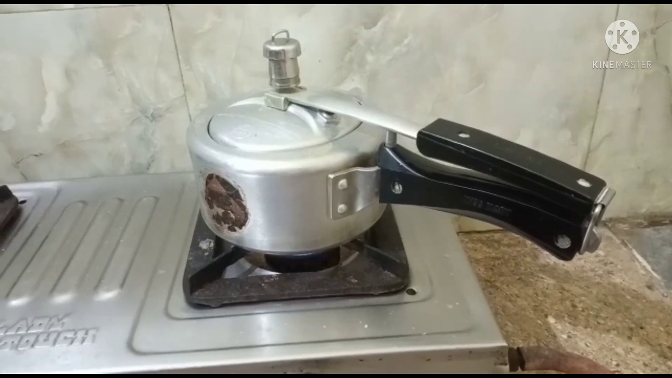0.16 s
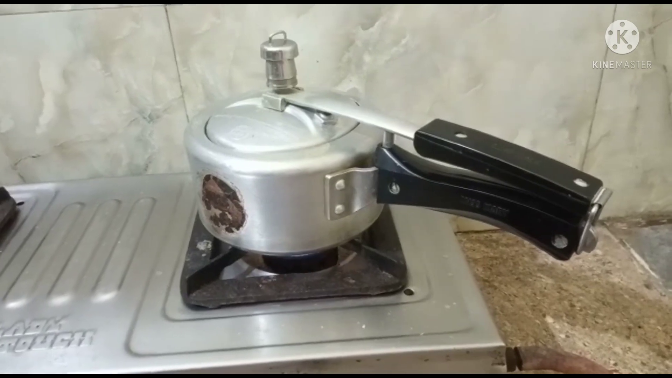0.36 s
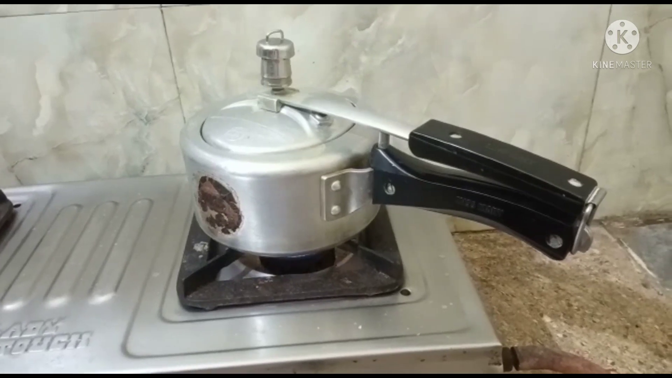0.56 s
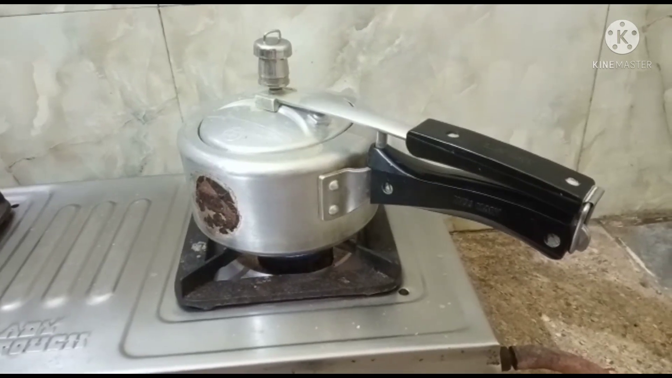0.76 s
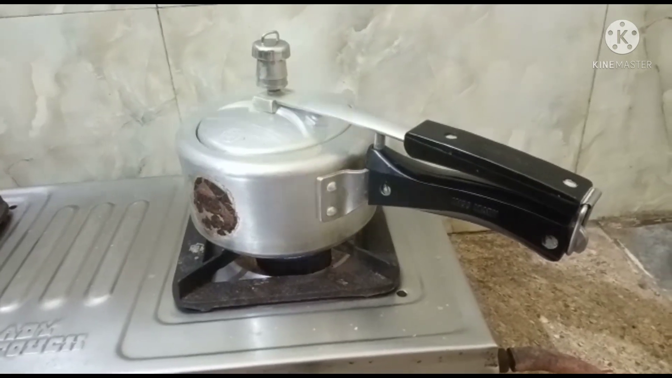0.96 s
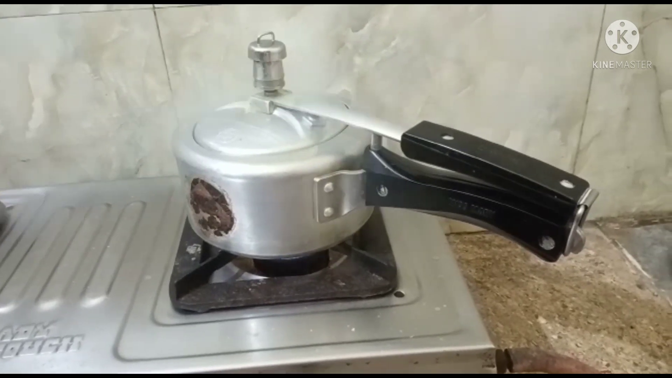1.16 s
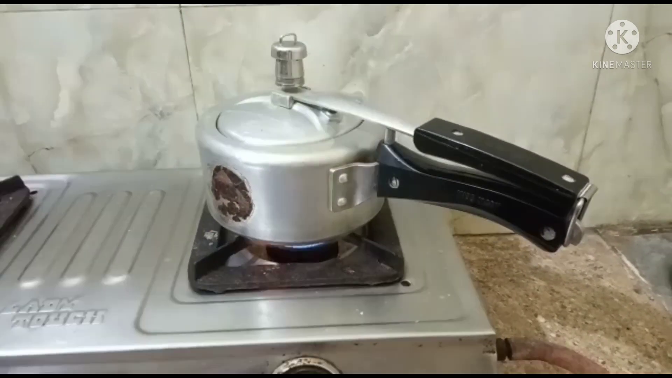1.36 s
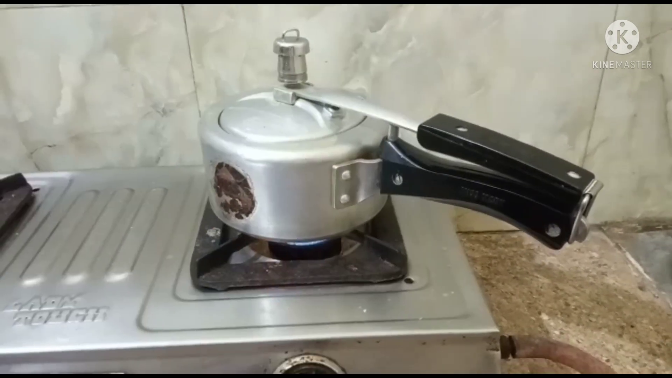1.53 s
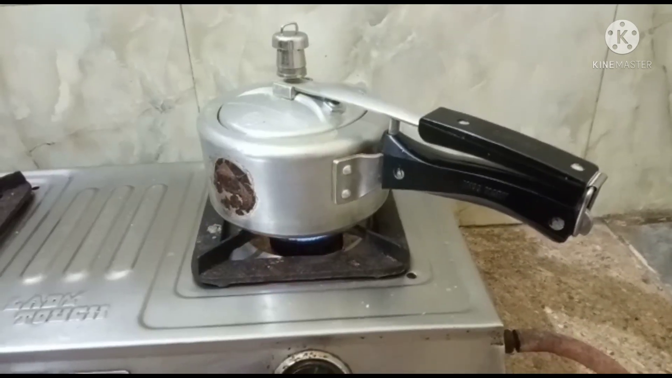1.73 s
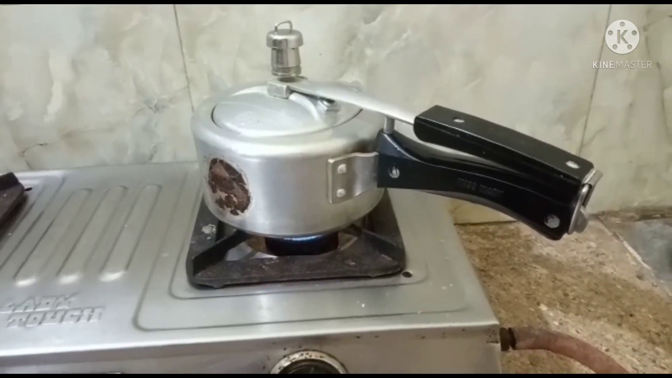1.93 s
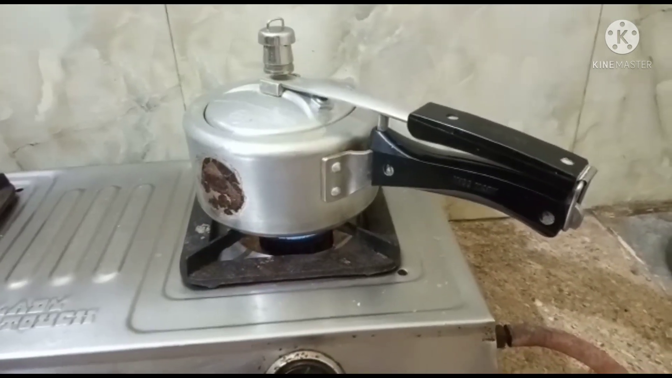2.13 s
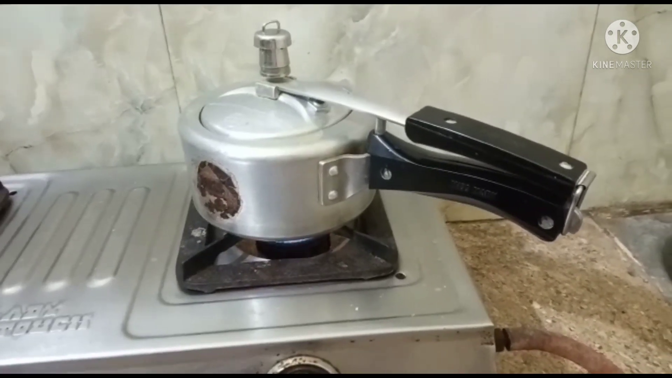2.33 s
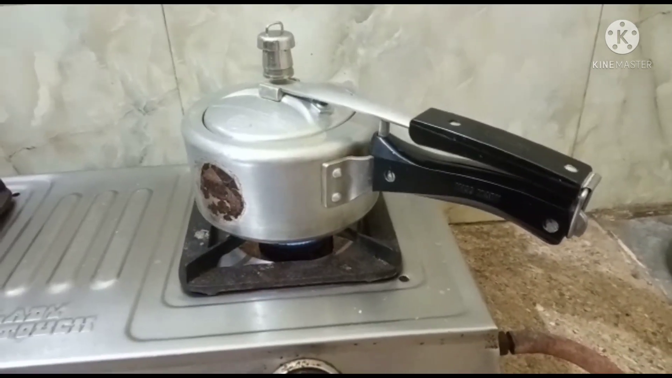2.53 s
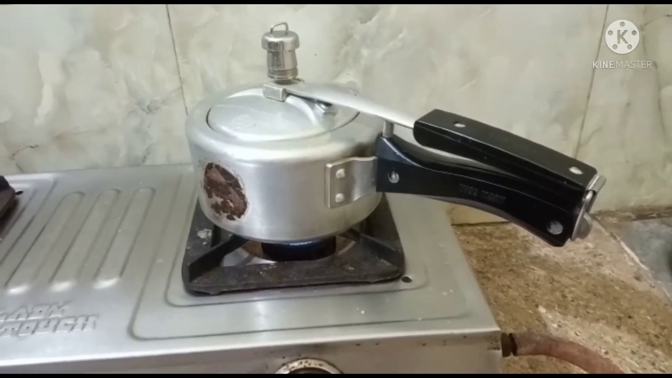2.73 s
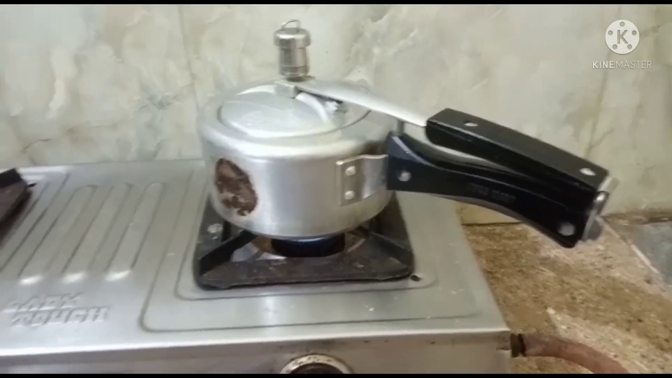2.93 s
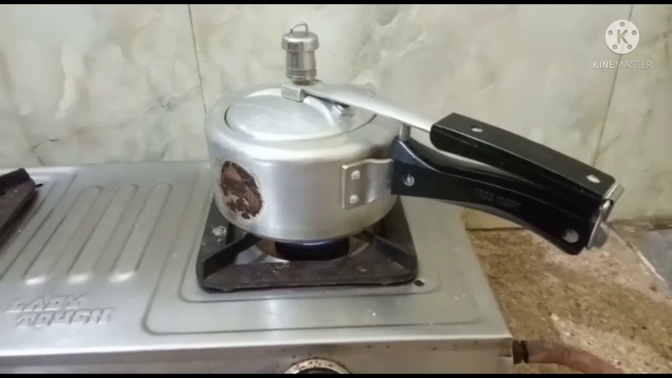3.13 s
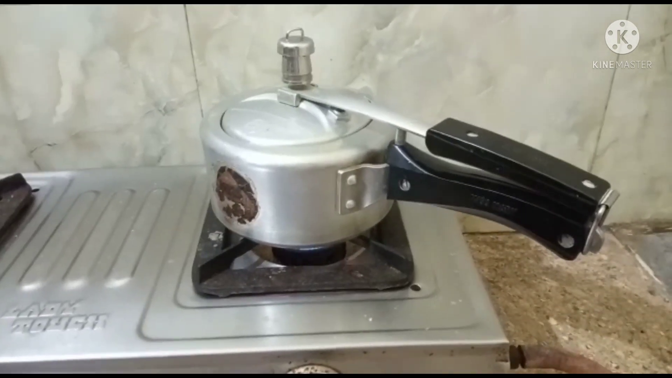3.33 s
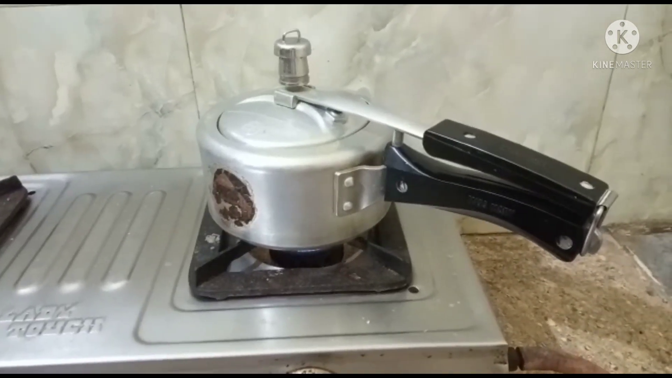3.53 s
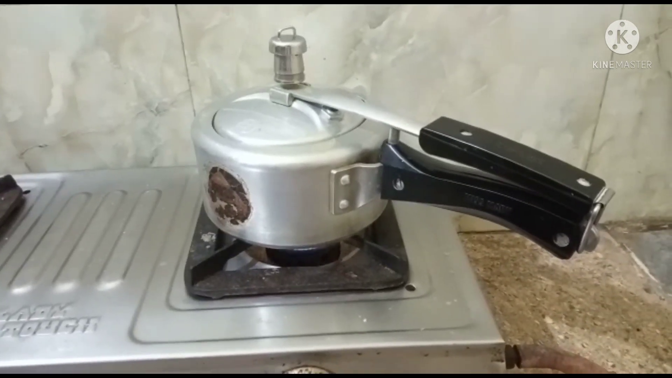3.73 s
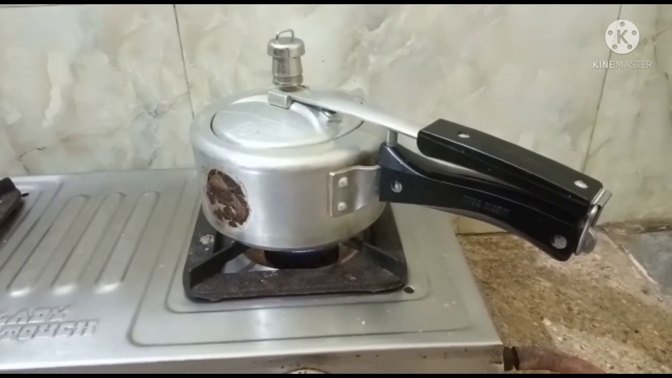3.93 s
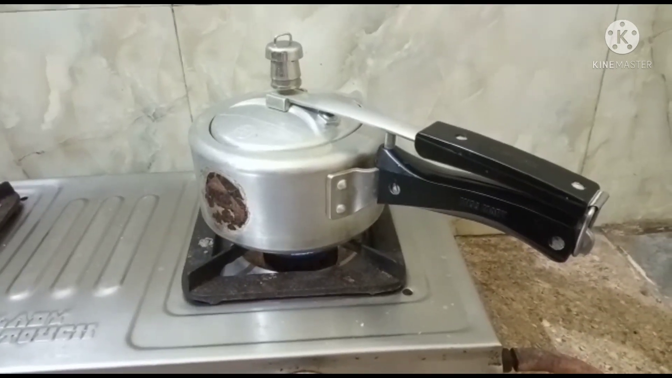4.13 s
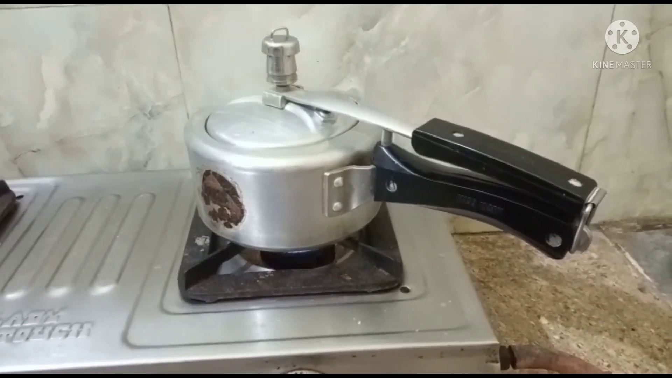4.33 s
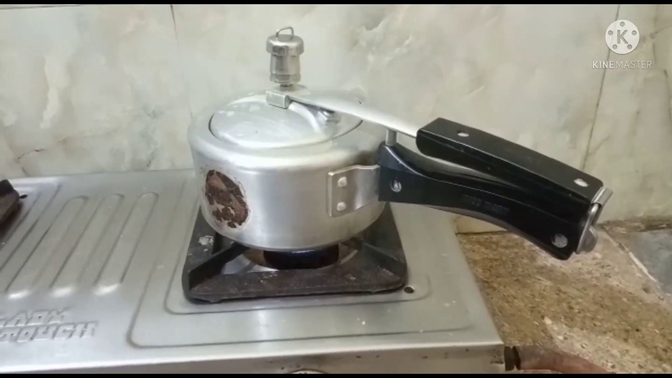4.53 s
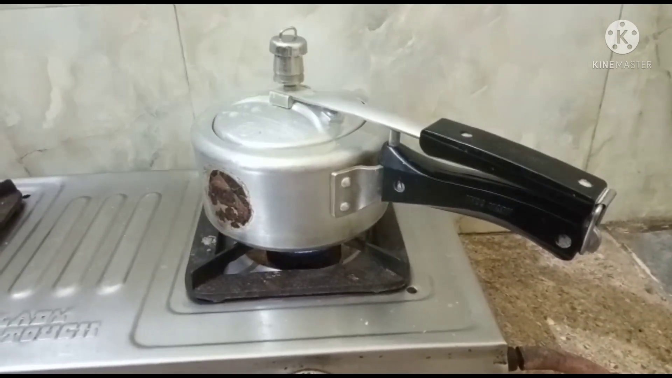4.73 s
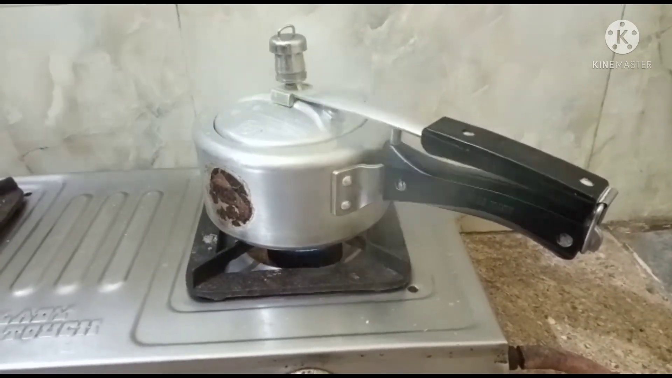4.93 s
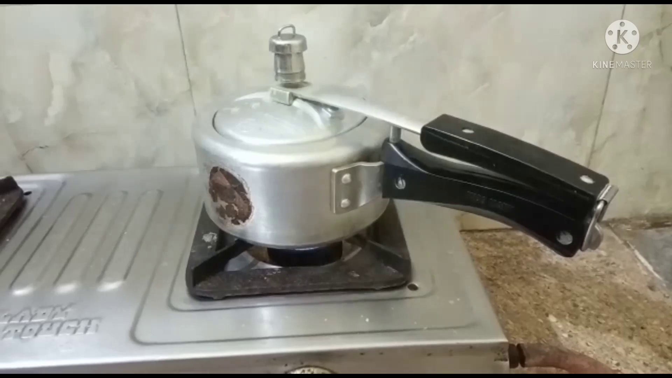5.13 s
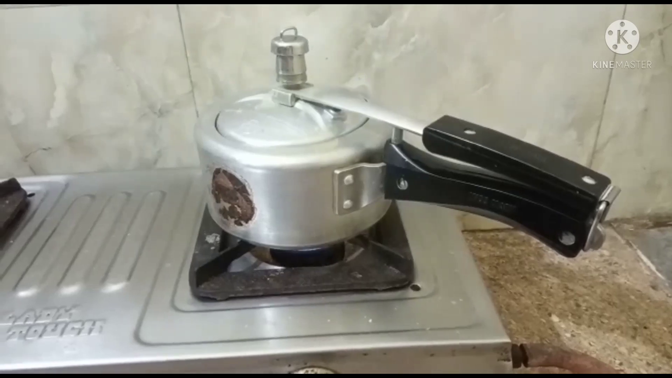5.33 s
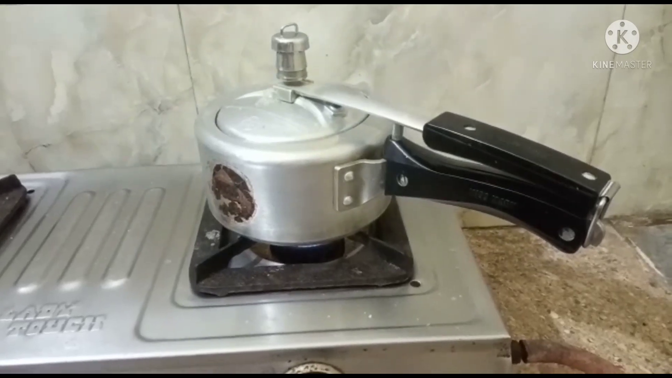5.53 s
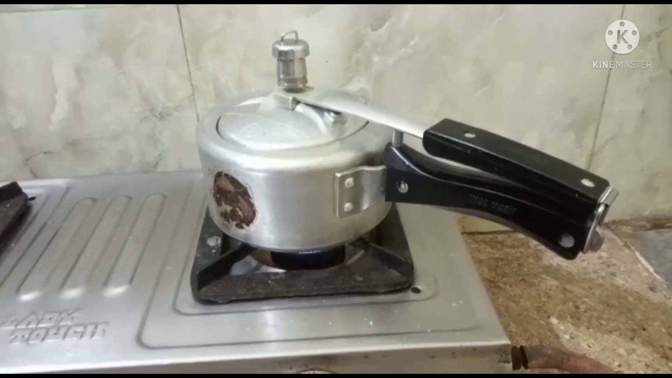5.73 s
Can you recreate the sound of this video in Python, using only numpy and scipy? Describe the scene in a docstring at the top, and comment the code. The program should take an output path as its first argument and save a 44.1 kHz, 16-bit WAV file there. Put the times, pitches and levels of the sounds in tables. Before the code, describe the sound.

A small pressure cooker hisses out a strong jet of steam, cuts abruptly to silence, simmers quietly, then vents again more softly before settling.

```python
"""A small pressure cooker on a gas ring, heard close by in a tiled kitchen corner.
First burst: filtered noise hisses through the gap under the weight valve, a broad jet roars when the weight
lifts, and noise-rung resonances simmer below. It breaks off into a short silence. Simmer, gas flame and faint
hum fade back in; a thin leak and short puffs of steam build up to a second burst, then the simmer is left.
"""
import sys
import numpy as np
from scipy import signal
from scipy.fft import rfft, irfft
from scipy.io import wavfile

SR = 44100
rng = np.random.default_rng(int(sys.argv[2]) if len(sys.argv) > 2 else 0)


def dump_mix(stems):
    """Bounce the given channels to the path in sys.argv[1] as a 16-bit WAV at rate SR."""
    frames = np.atleast_2d(stems).T  # one column per channel
    limited = np.clip(frames, -1, 1)  # hard clip at full scale
    pcm = np.round(limited * 32767).astype(np.int16)
    wavfile.write(sys.argv[1], SR, pcm)


N = 259431
TIME_S = np.arange(N) / SR
FREQS_HZ = np.maximum(np.fft.rfftfreq(N, 1 / SR), 1)

# Gas flame colour. Each row: frequency in Hz, relative level in dB.
FLAME_COLOUR = [(50, -29), (100, -14), (180, -16.5), (300, -18), (760, 0), (1050, -2.5), (1380, -8),
                (1950, -10), (2400, -11.5), (3000, -12.5), (3500, -15.5), (7000, -4), (15000, -24)]
# Pot resonances rung by boiling water. Each row: frequency in Hz, nominal width in Hz, relative level in dB.
POT_RESONANCES = [(268.7, 34, -8.5), (316, 19, -7.5), (382.4, 66, 0.5), (461.5, 48, -3.5),
                  (585.3, 14, -5.5), (899, 45, -4.5), (1030, 73, -1.5), (1260, 70, -7), (1556, 160, -4),
                  (1890, 290, -3.5)]
# Loudest bubbles. Each row: centre in seconds, mean pitch in Hz, peak before any fade in dB,
# Gaussian half-length in seconds.
LOUD_BUBBLES = [(1.653, 806, -60, 0.019), (1.875, 385, -59.5, 0.019), (1.973, 298, -66.5, 0.019),
                (2.107, 386.7, -67, .022), (2.486, 335, -66.5, .03), (2.826, 415, -66.5, .022),
                (2.936, 295, -71, .025), (3.196, 403, -67, 0.02), (3.357, 322, -70, 0.022),
                (3.902, 369, -72.5, 0.0387), (5.113, 382, -64, 0.024), (5.664, 390, -64.5, 0.025),
                (5.831, 385, -71, .029)]
# The simmer eases briefly. Each row: centre in seconds, Gaussian half-length in seconds.
SIMMER_LULLS = [(1.8, 0.03), (3.552, 0.078), (3.733, 0.11), (4.034, 0.084), (5.313, 0.1)]
# Steam through the gap under the seated weight.
# Each row: start in seconds, length in seconds, flow in dB, attack time constant in seconds.
GAP_VENTS = [(-0.02, 0.31, -40, 0.084), (0.361, 0.98, -38.5, 0.039), (1.594, 4.27, -76, 0.014),
             (1.89, 2.57, -58, 0.24), (2.176, 1.13, -63, .045), (2.71, 0.38, -57, 0.073),
             (3.466, .215, -53.8, 0.034), (3.69, 0.32, -66, 0.024), (3.936, 0.42, -54.3, 0.07),
             (4.227, 0.85, -43.5, 0.014)]
# The weight hops off its seat.
# Each row: start in seconds, length in seconds, added hiss flow in dB, roar drive in dB.
WEIGHT_LIFTS = [(0.516, 0.2, -35, -49), (0.691, 0.29, -37.5, -50), (0.969, 0.11, -35.5, -48),
                (1.067, 0.094, -37, -55), (4.294, 0.063, -41, -58), (4.395, 0.16, -39.5, -52.5),
                (4.57, 0.265, -42, -57), (4.653, 0.038, -50, -54.5), (4.924, 0.031, -41, -58)]
# Free jet colour. Each row: frequency in Hz, relative level in dB.
JET_COLOUR = [(20, -34.5), (45, -14), (80, 0), (125, 2.5), (300, 3), (1100, 2), (2500, 2.5), (6000, -5),
              (15000, -2)]
# Hiss colour per burst, the weight sitting differently on its seat; the skirt is its weak low end.
# Each row: frequency in Hz, relative level in dB.
FIRST_LOW_SKIRT = [(25, -51), (70, -39.5), (110, -25.5), (155, -39.5), (225, -15.5), (320, -25.5),
                   (520, -31.5), (820, -17.5), (1130, -27)]
FIRST_GAP_COLOUR = [(1700, -19), (2900, -15.5), (4000, -9), (5200, -4), (6200, .5), (6750, -0.5),
                    (7650, -8), (8400, -6.5), (9200, -8), (10500, -8.5), (11600, -13), (13200, -22),
                    (15300, -24)]
SECOND_LOW_SKIRT = [(25, -31), (175, -47), (250, -22), (400, -35), (700, -20.5), (1300, -21)]
SECOND_GAP_COLOUR = [(1500, -22), (2400, -16), (2800, -17), (3500, -12.5), (4200, -13), (5000, -8.5),
                     (5800, -8.5), (6800, -2), (7900, -1), (8650, -4.5), (9300, -9), (10300, -6),
                     (13200, -4), (15300, -10.5)]
# Echoes from lid, hob and tiles per burst. Each row: delay in seconds, linear gain.
FIRST_REFLECTIONS = [(.00185, .12), (.00338, .17), (.00505, .1), (.00612, .12), (.0074, .13)]
SECOND_REFLECTIONS = [(.0018, .12), (.00505, .1), (.00595, .14), (.00752, .09), (.0091, .07)]

BREAK_S, SILENCE_S, FADE_IN_S = 1.38, 0.021, 0.48
BREAK_DECAY_S = 0.00078
TOP_HZ = 15500
VENT_RELEASE_S = 0.037  # the gap closes
LIFT_ATTACK_S, LIFT_RELEASE_S = 0.016, 0.028  # the weight rises and settles
FULL_FLOW_DB = -42.5  # flow of a fully open gap
BOIL_RISE_DB, BOIL_LAG_S = 4.5, 0.16
LULL_DEPTH_DB = -6


def undb(db):
    """Decibels to linear gain."""
    return 10 ** (np.asarray(db) / 20)


def noise(colour, band_hz):
    """Gaussian noise shaped by a (Hz, dB) colour, rms 1 inside the band."""
    hz, db = np.transpose(colour)
    gain = undb(np.interp(np.log(FREQS_HZ), np.log(hz), db))
    spectrum = rfft(rng.standard_normal(N)) * gain
    inside = (FREQS_HZ > band_hz[0]) & (FREQS_HZ < band_hz[1])
    return irfft(spectrum, N) / irfft(spectrum * inside, N).std()


def walk(rate_hz):
    """Smooth random wander, low-passed near rate_hz; standard deviation 1."""
    wander = irfft(rfft(rng.standard_normal(N)) * np.exp(-(FREQS_HZ / rate_hz) ** 2), N)
    return wander / wander.std()


def swell(start_s, length_s, attack_s, release_s):
    """Gain that rises exponentially towards 1, then dies away after the length."""
    age_s = np.maximum(TIME_S - start_s, 0)
    rise = 1 - np.exp(-age_s / attack_s)
    fall = np.exp(-np.maximum(age_s - length_s, 0) / release_s)
    return rise * fall


def echo(x, reflections):
    """Near hard surfaces comb the sound with short echoes."""
    delayed = [gain * np.pad(x, (round(delay_s * SR), 0))[:N] for delay_s, gain in reflections]
    return x + sum(delayed)


def kitchen(x, t60_s, wet_db):
    """Tiled walls add a short, exponentially decaying noise tail."""
    age_s = TIME_S[:SR // 2]
    decay = np.exp(-np.log(1000) * age_s / t60_s)
    tail = rng.standard_normal(len(age_s)) * decay * (age_s > .008)
    return x + undb(wet_db) * signal.fftconvolve(x, tail / np.linalg.norm(tail))[:N]


def hum(hz, level_db):
    """Faint kitchen hum: a sine wavering in pitch and level."""
    pitch_hz = hz + 2 * walk(16.0)
    return undb(level_db + 2 * walk(10)) * np.sin(2 * np.pi * np.cumsum(pitch_hz) / SR)


def flame(level_db, flicker_db):
    """Soft rush of the burner: coloured noise with a quick level flicker."""
    return noise(FLAME_COLOUR, (30, 15000)) * undb(level_db + flicker_db * walk(40))


def vigour(flow):
    """Boil strength in dB: escaping steam lowers the pressure, so water boils harder a moment later."""
    keep = np.exp(-1 / (BOIL_LAG_S * SR))
    opening = np.minimum(flow / undb(FULL_FLOW_DB), 1) ** .5
    relief = signal.lfilter([1 - keep], [1, -keep], opening)
    lull = sum(np.exp(-((TIME_S - s) / length_s) ** 2) for s, length_s in SIMMER_LULLS)
    return BOIL_RISE_DB * relief + LULL_DEPTH_DB * lull


def boil(vigour_db, level_db, churn_db):
    """Noise rings each pot resonance, all churning independently; larger bubbles are short sine pulses."""
    out = 0
    for hz, width_hz, db in POT_RESONANCES:
        detune = (FREQS_HZ / hz - hz / FREQS_HZ) * hz / (1.4 * width_hz)
        ring = irfft(rfft(rng.standard_normal(N)) / (1 + 1j * detune) ** 2, N)
        gain = undb(level_db + vigour_db + db + churn_db * walk(16))
        out = out + ring / ring.std() * gain
    wobble = 0.048 * walk(120)
    for s, hz, db, length_s in LOUD_BUBBLES:
        age = (TIME_S - s) / length_s
        near = np.abs(age) < 4
        pitch_hz = hz * (1 + wobble[near])
        tone = np.sin(2 * np.pi * np.cumsum(pitch_hz) / SR)
        out[near] += undb(db) * np.exp(-age[near] ** 2) * tone
    return out


def valve(since_s, until_s):
    """Hiss flow and roar drive of vents and lifts starting in the interval; powers add."""
    flow, roar = np.zeros(N), np.zeros(N)
    for start_s, length_s, db, attack_s in GAP_VENTS:
        if since_s <= start_s < until_s:
            vent = swell(start_s, length_s, attack_s, VENT_RELEASE_S)
            flow = np.hypot(flow, undb(db) * vent)
    for start_s, length_s, hiss_db, roar_db in WEIGHT_LIFTS:
        if since_s <= start_s < until_s:
            lift = swell(start_s, length_s, LIFT_ATTACK_S, LIFT_RELEASE_S)
            flow = np.hypot(flow, undb(hiss_db) * lift)
            roar = np.hypot(roar, undb(roar_db) * lift)
    return flow, roar


def jet(roar, gain_db, buffet_db):
    """The lifted weight frees a broad jet: coloured noise with a buffeting level."""
    return noise(JET_COLOUR, (80, 2500)) * roar * undb(gain_db + buffet_db * walk(67))


def hiss(flow, colour, band_hz, top_hz, top_db, body_db, brighten, thin, flutter_db, body_hz=4000):
    """Steam squeezed through the valve gap: flow tilts its noise colour; it flutters as the weight trembles."""
    opening_db = 20 * np.log10(np.maximum(flow / undb(FULL_FLOW_DB), .1))
    steam = rfft(noise(colour, band_hz))
    fine = 1 / (1 + (top_hz / FREQS_HZ) ** 12)
    coarse = 1 / (1 + (FREQS_HZ / body_hz) ** 6)
    body = irfft(steam * coarse, N)
    core = irfft(steam * (1 - coarse - fine), N)
    top = irfft(steam * fine, N)
    # per dB of flow, fine eddies gain 'brighten' dB and coarse ones lose 'thin' dB against the gap's resonance
    top_gain = undb(top_db + brighten * opening_db)
    body_gain = undb(body_db - thin * opening_db)
    mix = body_gain * body + core + top_gain * top / top.std()
    return mix * flow * undb(flutter_db * walk(70))


def scene():
    """Two bursts over the simmering pot, parted by a sudden silence; both channels equal."""
    first_flow, first_roar = valve(-np.inf, BREAK_S)
    second_flow, second_roar = valve(BREAK_S, np.inf)

    water = boil(vigour(first_flow + second_flow), level_db=-80.0, churn_db=3.5)
    stove = water + flame(level_db=-73.0, flicker_db=2.0) + hum(hz=119, level_db=-96.0)

    first_colour = np.vstack([FIRST_LOW_SKIRT, FIRST_GAP_COLOUR])
    first = hiss(first_flow, first_colour, (4000, 10000), top_hz=11600,
                 top_db=-13.5, body_db=1.5, brighten=0.15, thin=0.56, flutter_db=0.45)
    first = first + jet(first_roar, gain_db=1, buffet_db=1.0)
    first = kitchen(echo(first, FIRST_REFLECTIONS), t60_s=0.23, wet_db=-14.5)

    second_colour = np.vstack([SECOND_LOW_SKIRT, SECOND_GAP_COLOUR])
    second = hiss(second_flow, second_colour, (5000, 10000), top_hz=10000,
                  top_db=-4.5, body_db=-2.5, brighten=0.048, thin=0.31, flutter_db=.5)
    second = second + jet(second_roar, gain_db=0.5, buffet_db=2.0)
    second = kitchen(echo(second, SECOND_REFLECTIONS), t60_s=0.18, wet_db=-14)

    since_break_s = TIME_S - BREAK_S
    before = np.exp(-np.maximum(since_break_s, 0) / BREAK_DECAY_S)
    fade_in = np.clip((since_break_s - SILENCE_S) / FADE_IN_S, 0, 1) ** 0.72
    mono = before * (first + stove) + second + fade_in * stove
    return np.array([mono, mono])


def record(dry):
    """A linear-phase low-pass cuts the top steeply."""
    low_pass = signal.firwin(1601, TOP_HZ, fs=SR)
    return signal.fftconvolve(dry, low_pass[None], mode="same", axes=1)


dry = scene()
out = record(dry)
dump_mix(out)
```